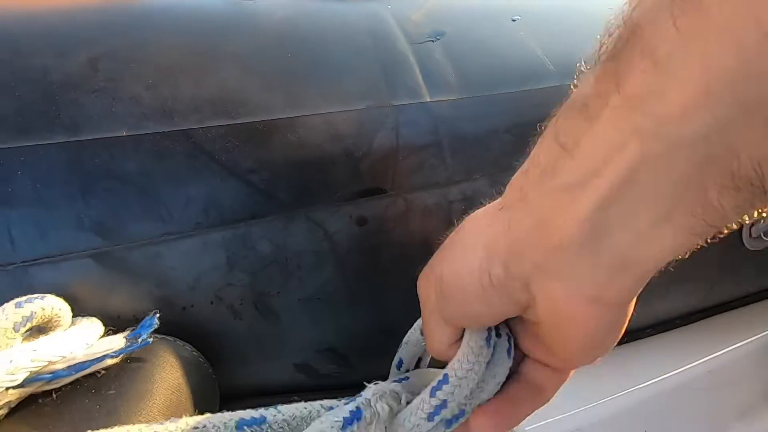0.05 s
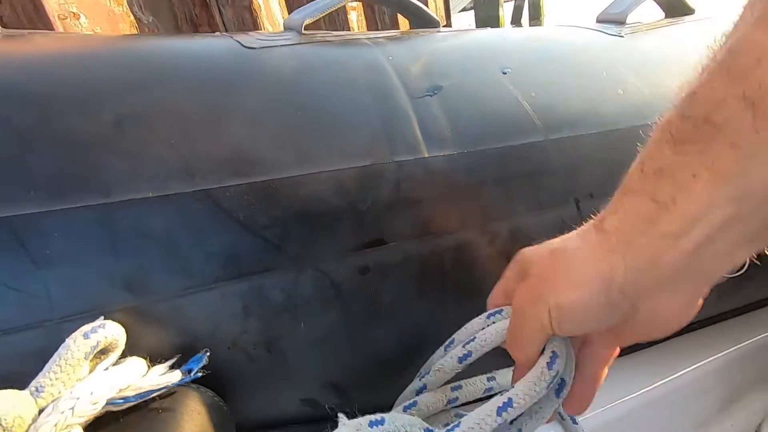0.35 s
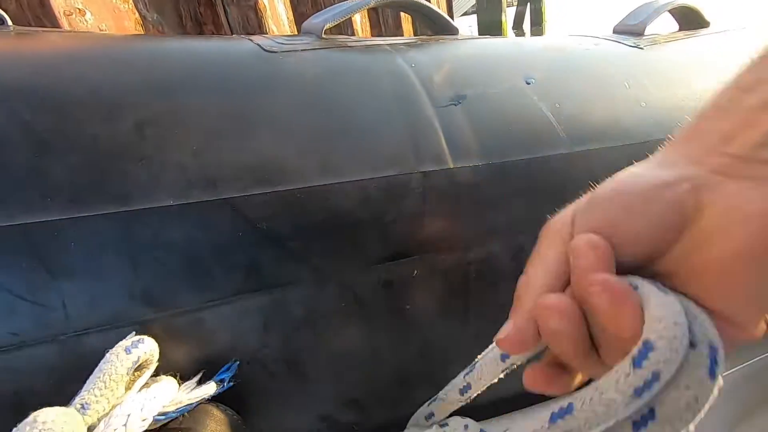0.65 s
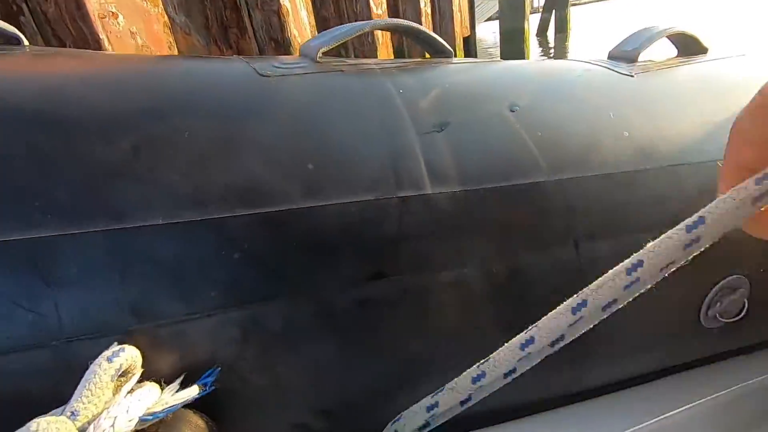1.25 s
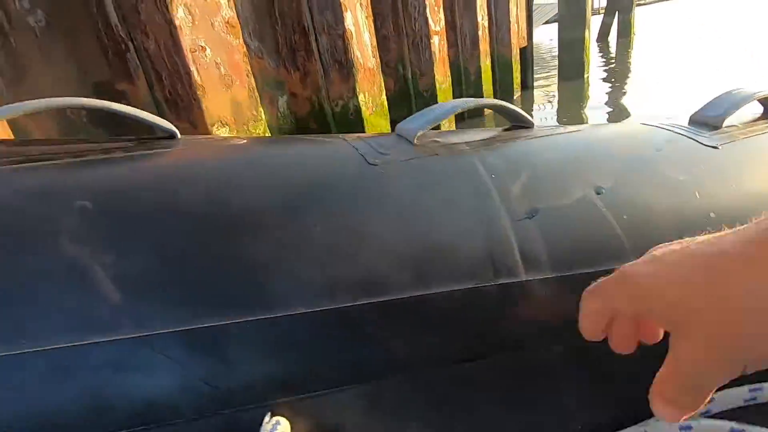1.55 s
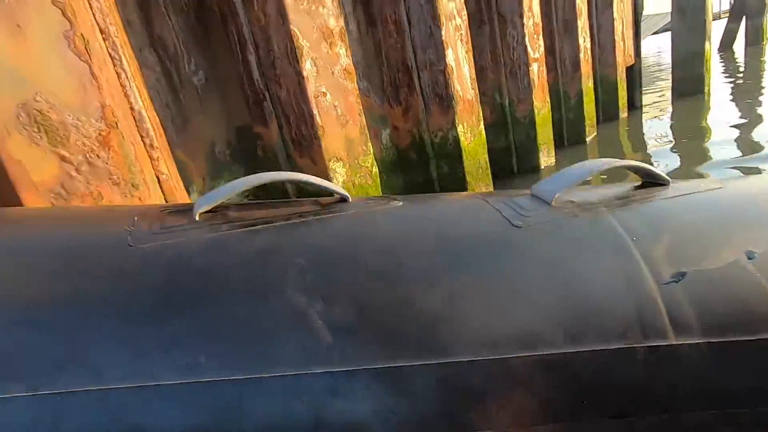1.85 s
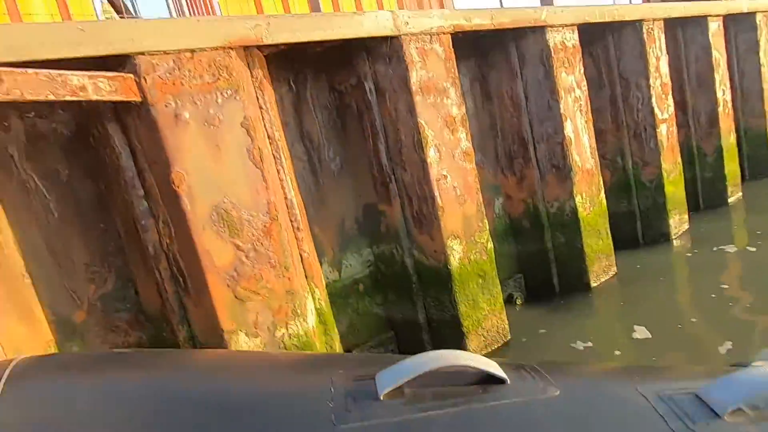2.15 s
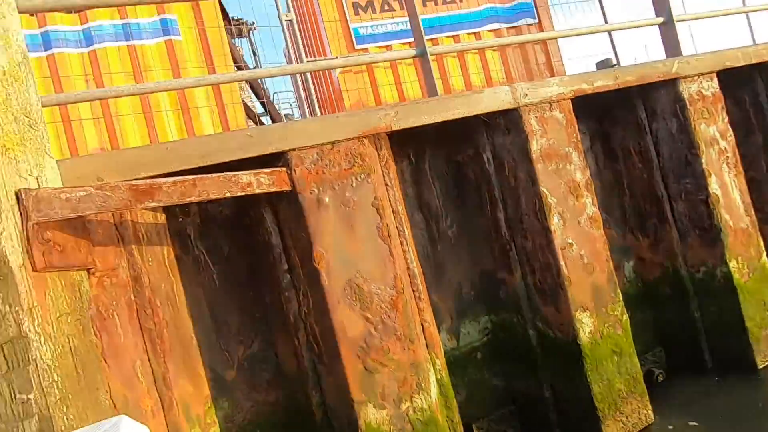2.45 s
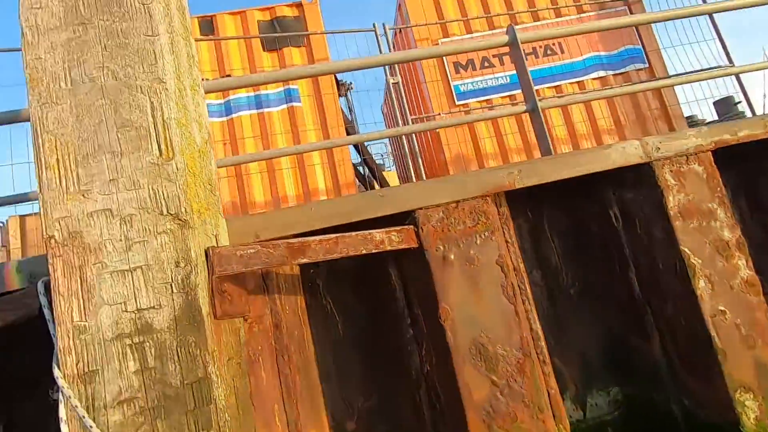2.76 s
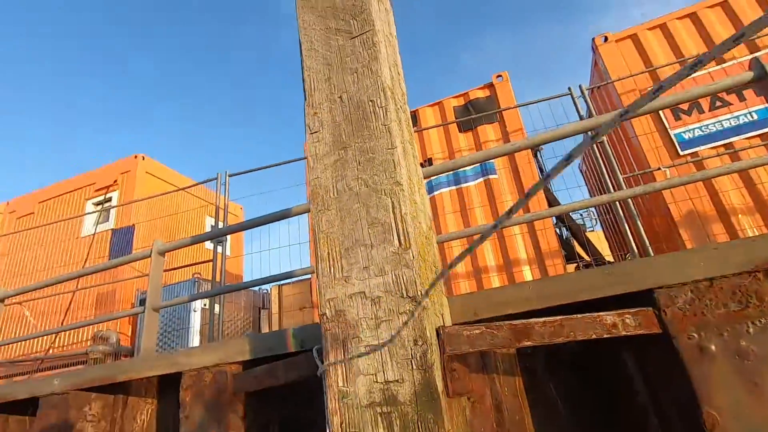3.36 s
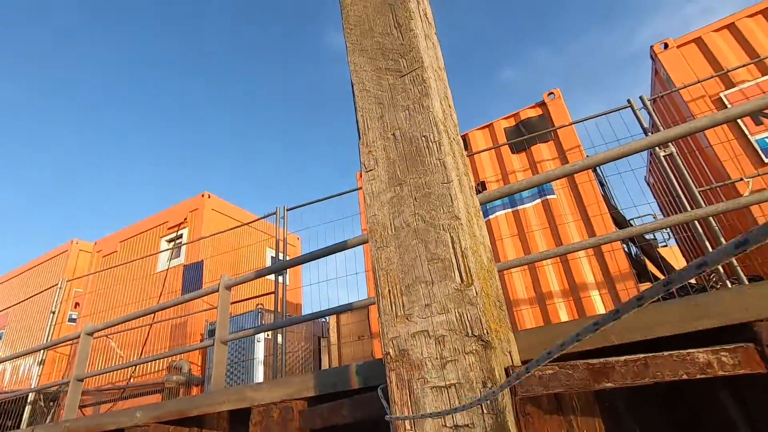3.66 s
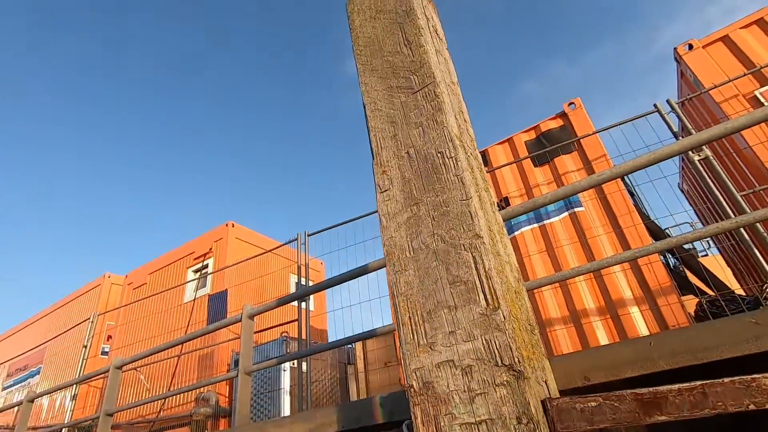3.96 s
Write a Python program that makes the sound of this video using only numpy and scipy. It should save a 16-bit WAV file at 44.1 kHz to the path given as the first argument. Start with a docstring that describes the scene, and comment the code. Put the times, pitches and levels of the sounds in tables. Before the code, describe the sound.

A rope hisses through a hand and thumps an inflatable boat over low wind rumble.

```python
"""A mooring rope is gathered in an inflatable boat and cast round a wooden pile at a steel quay.
Its braid hisses through the hand, rasps, zips and squeaks, and scuffs and thumps the ringing air tube.
It knocks twice right at the microphone with a puff of air, and at the end it slaps round the pile.
Underneath, wind rumbles and water laps, with a faint harbour hiss and a low hum that fades."""
import sys
import numpy as np
from scipy import signal
from scipy.fft import rfft, irfft
from scipy.io import wavfile
from scipy.ndimage import uniform_filter1d, minimum_filter1d

SR = 44100
rng = np.random.default_rng(int(sys.argv[2]) if len(sys.argv) > 2 else 0)


def generate_wav(signal):
    """Clip the signal to [-1, 1] and save it as 16-bit WAV at the path in sys.argv[1]."""
    frames = np.transpose(np.atleast_2d(signal))
    scaled = np.clip(frames, -1, 1) * 32767
    pcm = np.round(scaled).astype(np.int16)
    wavfile.write(sys.argv[1], SR, pcm)


N = 176400
T = np.arange(N) / SR

# Fader rides for wind, harbour hiss, hum, water and loose rope: time_s, level_db
WIND_RIDE = [(0,-32),(.45,-35.5),(.7,-34.5),(.95,-35.5),(1.1,-35.5),(1.2,-35.5),(1.255,-29),(1.3,-38),(1.42,-45.5),(1.6,-47),(1.94,-32.5),(2.3,-33.5),(2.56,-35),(2.72,-33),(2.86,-30.5),(2.96,-30.5),(3.2,-38),(3.44,-38),(3.54,-29),(3.6,-40.5),(4,-49)]
HISS_RIDE = [(0,-45),(.6,-63.5),(.93,-50.5),(1.25,-92),(1.42,-57),(1.72,-57.5),(1.8,-49),(1.95,-42),(2.3,-46.5),(2.8,-44.5),(3.15,-47.5),(3.3,-47),(3.7,-46.5),(4,-45.5)]
HUM_RIDE = [(0,-29.5),(.17,-38),(.33,-28),(.42,-34.5),(.55,-41),(.88,-45),(1.1,-40.5),(1.4,-40),(1.6,-53.5),(4,-57)]
WATER_RIDE = [(0,-52),(.6,-44.5),(.9,-45.5),(1.2,-47.5),(1.42,-52.5),(1.6,-50),(1.95,-45),(2.4,-44),(2.75,-39.5),(3.1,-41),(3.35,-41.5),(3.7,-42),(4,-38.5)]
RUSTLE_RIDE = [(0,-65),(1.1,-67),(1.4,-70),(1.7,-77),(1.95,-68),(3.1,-74),(3.3,-73),(3.75,-74.5),(4,-86)]
# Stereo width: time_s, side_db
WIDTH_RIDE = [(0,-13),(1.15,-6),(1.24,-3.5),(1.38,-1.5),(1.5,-9),(1.8,-21.5),(1.95,-54),(4,-57)]
# Tone curves of the air noises: frequency_hz, gain_db
WIND_EQ = [(20,-0.5),(40,0),(90,-3.5),(130,-9),(200,-14.5),(320,-22.5),(480,-56),(900,-53)]
HISS_EQ = [(150,20),(400,-2),(600,1),(900,-5.5),(1400,-4),(2200,-8),(3100,-6.5),(4700,-16.5),(5900,-38.5),(8500,-38.5),(10500,-38),(15000,-42.5)]
GUST_EQ = [(28,-1.5),(42,-1.5),(90,1),(130,-12),(220,-31.5),(400,-48.5)]
PUFF_EQ = [(55,-12.5),(90,10.5),(170,-10),(340,-9),(500,-24),(900,-31)]
# Tone curves of the rope's contacts: frequency_hz, gain_db
SLIDE_EQ = [(300,-0.5),(600,8.5),(1300,4),(2600,6),(4200,4),(5800,-5),(8200,-3.5),(10500,-12.5),(12500,-14),(15500,-19.5)]
DRAG_EQ = [(80,-6),(150,6),(300,5),(480,0.5),(650,-5.5),(1100,-15.5),(1800,-22),(4000,-30),(7000,-53)]
SMACK_EQ = [(200,-13.5),(400,6.5),(620,6),(900,-8),(1300,-10),(2500,-36),(5000,-50)]
KNOCK_EQ = [(300,5),(700,10),(1100,4.5),(1700,8),(2500,-2),(5500,-4.5),(8000,-17.5),(11000,-34),(15000,-45.5)]
SLAP_EQ = [(250,1),(700,2),(1500,0.5),(3000,-3.5),(4600,-9),(5800,-31),(12000,-32)]
# Resonances of the water at the quay, the taut rope and the pile: pitch_hz, width_hz, gain_db
WATER_BANDS = [(147.6,42,4),(208.2,43,-2),(316,95,-11.5),(578.5,39,-11.5),(867,510,-29.5),(2920,260,-32.5)]
ROPE_BANDS = [(557,110,10.5),(830,130,-2.5),(1095,49,1.5),(1680,67,-1.5),(1900,110,3),(2302,260,1),(2690,90,6.5),(3200,250,3),(4430,1100,-7.5)]
PILE_BANDS = [(398,120,-17),(637,80,5.5),(965,100,2),(1210,59,5.5),(1670,110,-5.5),(2040,73,5.5),(2560,80,-5),(2772,53,1.5),(3230,130,-13)]
# Ring of the air tube: pitch_hz, gain_db, t60_s
TUBE_RING = [(110.4,3,0.19),(210.1,0,0.19),(281.7,1,0.14),(365.5,-8,0.12),(496,-3.5,.06),(580,-4.5,0.036),(700,-7.5,0.011),(940,-8,0.016),(1090,-12,0.018),(1565,-9,0.042),(2240,-26,.03),(3176,-16,0.022)]
# Ring of the microphone casing: pitch_hz, gain_db, t60_s, left_offset_db
CASING_RING = [(180,-14.5,.06,-8),(328,-8,0.041,-11),(535,-18.5,.025,-5),(712,-2.5,0.016,-4),(822,-6,0.017,0),(1297,1.5,0.02,2)]
# Bounces off deck, tube and quay: delay_s, gain_db
REFLECTIONS = [(.0029,-31.5),(.0087,-19),(.021,-23)]
# Gusts on the microphone: peak_s, rise_s, fall_s, level_db
WIND_GUSTS = [(1.1,0.011,.012,-27),(2.09,0.024,0.017,-36),(2.4,0.034,.05,-36),(2.68,0.011,0.047,-24),(2.79,0.025,0.028,-28.5),(2.96,.02,0.075,-28.5),(3.185,0.01,0.034,-29.5),(3.535,0.012,0.0089,-37)]
# Rope running through the hand: peak_s, rise_s, fall_s, level_db, cutoff_hz
HAND_SLIDES = [(0.249,0.047,0.13,-50,9200),(.48,0.03,0.086,-61.5,3840),(.755,0.055,0.026,-48.5,13400),(.85,0.025,0.03,-50,12000),(1.0,0.028,0.043,-51,6550),(1.212,0.039,0.032,-44.5,14800),(1.36,0.012,0.016,-51.5,6000),(1.825,.008,0.017,-64,14000),(1.98,0.045,0.022,-57.5,7360),(2.088,0.0054,0.023,-45,10000),(2.28,0.038,0.067,-61.5,7000),(2.55,0.034,0.037,-61.5,5970),(2.69,0.014,0.013,-54,4960),(2.98,0.14,0.027,-68,6900),(3.13,0.043,0.041,-60.5,10300),(3.43,0.0033,0.016,-49,5000),(3.558,0.009,0.03,-48,3980),(3.947,.012,0.016,-55.5,8750)]
# Rope dragging over the tube: peak_s, rise_s, fall_s, level_db
TUBE_DRAGS = [(.3,0.039,0.042,-44.5),(.85,0.019,0.013,-42),(1.236,0.0095,0.028,-28.5),(1.98,0.0096,0.0077,-45.5),(2.682,.025,0.035,-32),(2.87,0.045,0.037,-41.5),(3.005,0.03,0.022,-34.5),(3.184,0.0039,0.014,-42),(3.53,0.018,0.006,-34.5),(3.599,0.011,.012,-35)]
# Rope slipping in quick bursts: peak_s, rise_s, fall_s, level_db, cutoff_hz
ROPE_RASPS = [(0.84,.001,0.0041,-38.5,4000),(.851,0.0017,0.0041,-36,4000),(0.862,.003,0.011,-43,3500),(1.229,0.0017,0.0099,-34.5,900),(1.245,.008,0.013,-41.5,9000),(1.757,0.002,0.008,-43,2000),(1.821,0.0053,.012,-43,2510),(2.088,0.0043,0.01,-46.5,9000),(2.671,0.0054,0.013,-38.5,1500),(3.004,0.012,0.011,-48,613),(3.554,0.01,0.0082,-37.5,4000),(3.946,0.0085,0.011,-48.5,6000)]
# Zips, chirps and ticks of fibres: peak_s, level_db, pitch_hz, width_hz, fall_s
FIBRE_ZIPS = [(0.065,-54,4020,1510,0.003),(0.085,-52.5,4100,1590,0.0034),(0.188,-35,4100,700,0.0032),(1.2386,-35,7200,1300,0.0054),(1.245,-31.5,6950,800,0.0055),(1.518,-72.5,6720,4000,0.0145),(2.413,-57,5030,2500,0.0024),(2.669,-40,1045,200,0.033),(3.384,-45.5,4970,4130,0.0015),(3.881,-65,8650,1210,0.0032)]
# Rope dropping on the tube: start_s, thump_db, cutoff_hz, pitch_ratio, smack_db
ROPE_DROPS = [(.298,-39,700,1.1,-42),(1.611,-49,900,1.19,-50),(1.759,-37.5,1520,1.08,-33.5),(1.817,-27.5,1000,1.154,-31),(1.910,-32.5,507,1.01,-35.5),(2.166,-22,686,1.095,-17.5),(2.194,-24,200,1.17,-46),(2.242,-30,250,0.9,-44),(2.329,-27.5,513,.97,-31),(2.44,-46.5,1200,1.31,-54),(2.663,-45,1500,0.63,-43.5),(2.972,-37.5,600,1.2,-51),(3.006,-38,900,1.07,-39),(3.172,-35.5,380,0.99,-47),(3.539,-29.5,600,.9,-32)]
# Two touches, then two knocks at the microphone: start_s, crack_db, push_db, ring_db, push_left_offset_db
MIC_KNOCKS = [(1.248,-47,-11,-34,0),(1.2592,-45,-26,-20,-1.5),(1.2693,-14.5,-2.5,2.5,-12),(1.3495,-19,-8,-38,-3)]
# Rope wrapping round the pile: start_s, level_db, decay_s, cutoff_hz
PILE_SLAPS = [(3.572,-34,0.0082,3000),(3.582,-21,0.0066,3490),(3.595,-36,0.0049,1000),(3.605,-36,0.0036,500),(3.619,-45,0.0076,1800)]


def from_db(db):
    """Decibels to gain."""
    return 10 ** (np.asarray(db) / 20)


def rms_one(x):
    """Scale to rms 1."""
    return x / np.sqrt(np.mean(x ** 2) + 1e-20)


def fader(ride):
    """Gain over time along a ride."""
    return from_db(np.interp(T, *np.transpose(ride)))


def drift(rate_hz):
    """Smooth random wander with a spread of 1."""
    hop, run_in = 40, 2000
    r = np.exp(-2 * np.pi * rate_hz * hop / SR)
    slow = signal.lfilter([1], [1, -2 * r, r * r], rng.standard_normal(N // hop + run_in + 2))[run_in:]
    return np.interp(np.arange(N) / hop, np.arange(len(slow)), rms_one(slow))


def eq(x, curve):
    """Apply a tone curve that rolls off past its ends; white noise keeps its power."""
    hz, db = np.transpose(curve)
    f = np.arange(N // 2 + 1) * SR / N + 0.00079
    skirts = np.minimum(f / hz[0], 1) ** 2 * np.minimum(hz[-1] / f, 1) ** 2
    response = skirts * from_db(np.interp(np.log(f), np.log(hz), db))
    return irfft(rfft(x) * rms_one(response), N)


def colour(x, curve):
    """Apply a tone curve and scale to rms 1."""
    return rms_one(eq(x, curve))


def grains(per_s, spread_db):
    """Two rows of random clicks of uneven size."""
    sizes = from_db(spread_db * np.minimum(rng.exponential(1, (2, N)), 4)) * rng.choice([-1, 1], (2, N))
    return rms_one(sizes * (rng.random((2, N)) < per_s / SR))


def swell(peak_s, rise_s, fall_s, db):
    """A lopsided bell envelope."""
    out = np.zeros(N)
    near = (T > peak_s - 9 * rise_s) & (T < peak_s + 9 * fall_s)
    age = T[near] - peak_s
    out[near] = from_db(db) * np.exp(-np.abs(age / np.where(age < 0, rise_s, fall_s)) ** 1.85 / 2)
    return out


def decay(start_s, decay_s):
    """Hard attack, exponential tail."""
    return (T >= start_s) * np.exp(-np.clip((T - start_s) / decay_s, 0, 60))


def resonate(x, hz, width_hz):
    """Band-pass with a peak gain of 1."""
    r = np.exp(-np.pi * width_hz / SR)
    poles = [1, -2 * r * np.cos(2 * np.pi * hz / SR), r * r]
    return signal.lfilter(np.array([1, 0, -1]) * (1 - r * r) / 2, poles, x + 1e-18)


def body(x, bands):
    """Parallel resonances in alternating polarity."""
    return sum((-1) ** k * from_db(db) * resonate(x, hz, width)
               for k, (hz, width, db) in enumerate(bands))


def ring(x, hz, t60):
    """Each click sets a decaying sine ringing."""
    r, w = np.exp(-np.log(1000) / (t60 * SR)), 2 * np.pi * hz / SR
    return signal.lfilter([0, np.sin(w)], [1, -2 * r * np.cos(w), r * r], x + 1e-18)


def soften(x, hz):
    """One-pole low-pass."""
    r = np.exp(-2 * np.pi * hz / SR)
    return signal.lfilter([1 - r], [1, -r], x + 1e-18)


def pass_filter(x, kind, hz, order):
    """Flat low-pass or high-pass."""
    return signal.sosfilt(signal.butter(order, hz, kind, fs=SR, output="sos"), x)


def stereo(pair, side_db=0, treble_lift_db=0.5, treble_floor_db=-13.5):
    """Mid and side to left and right along the width ride; the treble spreads wider."""
    mid, side = pair
    treble = pass_filter(side, "high", hz=10100, order=2)
    side = (side + from_db(treble_lift_db) * treble) * fader(WIDTH_RIDE)
    side += from_db(treble_floor_db) * treble
    return mid + side * from_db(side_db) * np.array([[1], [-1]])


def reflect(x):
    """Direct sound plus a few near reflections."""
    return x + sum(from_db(db) * np.pad(x, ((0, 0), (int(s * SR), 0)))[:, :N] for s, db in REFLECTIONS)


def harbour_hiss(flicker_db=2.5):
    """A faint, flickering bed of hiss."""
    hiss = stereo(colour(rng.standard_normal((2, N)), HISS_EQ))
    return hiss * fader(HISS_RIDE) * from_db(flicker_db * drift(24))


def hum(pitch_hz=128.5, waver_hz=5.5, flutter_db=3):
    """A low tone, unsteady in pitch and level."""
    phase = 2 * np.pi * np.cumsum(pitch_hz + waver_hz * drift(19.3)) / SR
    return np.sqrt(2) * np.sin(phase) * fader(HUM_RIDE) * from_db(flutter_db * drift(11))


def wind(trim_db=2, lumps_db=1):
    """A lumpy low rumble, close to mono."""
    rumble = stereo(colour(rng.standard_normal((2, N)), WIND_EQ), side_db=-14.5)
    return rumble * fader(WIND_RIDE) * from_db(trim_db - lumps_db * drift(14))


def gusts():
    """Deep lumps of wind buffet the microphone."""
    return colour(rng.standard_normal(N), GUST_EQ) * sum(swell(*row) for row in WIND_GUSTS)


def water(lapping_db=0.5):
    """Water laps along the quay wall in a soft, hollow wash."""
    noise = rng.standard_normal(N)
    hollows = sum(from_db(db) * resonate(resonate(noise, hz, width), hz, width)
                  for hz, width, db in WATER_BANDS)
    return rms_one(hollows) * fader(WATER_RIDE) * from_db(lapping_db * drift(5.2))


def slides(flutter_db=1.5):
    """Braid fibres flick past the skin, in strokes over a faint running rustle."""
    fibres = colour(grains(per_s=7000, spread_db=1.66), SLIDE_EQ) * from_db(flutter_db * drift(60))
    strokes = sum(rms_one(pass_filter(fibres, "low", cutoff_hz, order=1)) * swell(*stroke)
                  for *stroke, cutoff_hz in HAND_SLIDES)
    return stereo(fibres * fader(RUSTLE_RIDE) + strokes, side_db=2)


def zips(sag=0.084, rise_ratio=0.19):
    """Fibres catch and let go with a brief ring that sags in pitch."""
    noise, out = stereo(rng.standard_normal((2, N))), 0
    for peak_s, db, hz, width_hz, fall_s in FIBRE_ZIPS:
        pitch_hz = hz * (1 + sag * np.exp(-np.clip((T - peak_s) / fall_s, 0, 60)))
        tone = np.sqrt(2) * np.sin(2 * np.pi * np.cumsum(pitch_hz) / SR)
        roughness = rms_one(soften(soften(noise, width_hz / 2), width_hz / 2))
        out += tone * roughness * swell(peak_s, rise_ratio * fall_s, fall_s, db)
    return out


def squeak(start_s=2.079, length_s=0.057, start_hz=1880, rise_hz_per_s=14000, roughness=0.0918):
    """Rope sticks and slips on rubber, faster as it is pulled: one rough, rising squeak."""
    age = np.clip(T - start_s, 0, length_s)
    pitch_hz = (start_hz + rise_hz_per_s * age) * (1 + roughness * drift(319))
    phase = 2 * np.pi * np.cumsum(pitch_hz) / SR
    envelope = np.sqrt(np.abs(np.sin(np.pi * age / length_s))) * decay(start_s, decay_s=0.061)
    return from_db(-41) * envelope * (np.sin(phase) + from_db(-9) * np.sin(2 * phase))


def rasps():
    """Bursts of slips excite the taut rope's resonances."""
    rasp = body(grains(per_s=1200, spread_db=4), ROPE_BANDS)
    return stereo(sum(rms_one(soften(rasp, cutoff_hz)) * swell(*burst)
                      for *burst, cutoff_hz in ROPE_RASPS))


def drags(ring_db=-6):
    """The braid bumps over the rubber: a dull scuff that also rings the tube."""
    bumps = grains(per_s=1700, spread_db=4.5)[0]
    tube = sum((-1) ** k * ring(bumps * from_db(db), hz, t60)
               for k, (hz, db, t60) in enumerate(TUBE_RING))
    scuff = colour(bumps, DRAG_EQ) + from_db(ring_db) * rms_one(tube)
    return scuff * sum(swell(*row) for row in TUBE_DRAGS)


def thumps(settle_per_s=440, settle_s=0.016, settle_db=-12.5):
    """A soft blow, then the rest of the coil settles; both ring the air tube."""
    out = np.zeros(N)
    for start_s, db, cutoff_hz, pitch_ratio, _ in ROPE_DROPS:
        start = int(start_s * SR)
        age = T[:min(SR // 2, N - start)]
        contacts = (rng.random(len(age)) < settle_per_s / SR) * rng.standard_normal(len(age))
        contacts *= np.exp(-age / settle_s) * from_db(settle_db)
        contacts[0] += 1  # the first blow
        force = from_db(db) * soften(contacts, cutoff_hz)
        for k, (hz, mode_db, t60) in enumerate(TUBE_RING):
            gain = (-1) ** k * from_db(mode_db + rng.normal(0, 1.3))
            out[start:start + len(age)] += ring(force * gain, hz * pitch_ratio, t60)
    return out


def smacks(decay_s=0.0033):
    """The short, hollow smack as the rope meets the rubber skin."""
    envelope = sum(from_db(db) * decay(start_s, decay_s) for start_s, *_, db in ROPE_DROPS)
    return eq(rng.standard_normal(N) * envelope, SMACK_EQ)


def air_puff(peak_s=1.275, flutter_hz=66, flutter_db=-15.5):
    """The passing rope pushes air into the right microphone port, where it flutters out."""
    puff = colour(rng.standard_normal(N), PUFF_EQ) * swell(peak_s, rise_s=0.0037, fall_s=0.016, db=-22.5)
    flutter = np.sin(2 * np.pi * flutter_hz * (T - peak_s)) * decay(peak_s, decay_s=0.028)
    return (puff + from_db(flutter_db) * flutter) * np.array([[0], [1]])


def knocks(push_hz=110, push_t60_s=0.02, ring_rise_s=0.0025, right_lag_s=0.0003, crack_left_db=-7):
    """Each knock is a crack, a low push and a short ring of the casing, stronger on the right."""
    out, crack_envelope = np.zeros((2, N)), np.zeros(N)
    for start_s, crack_db, push_db, ring_db, push_left_db in MIC_KNOCKS:
        snap, tail = decay(start_s, 0.00096), from_db(-10.5) * decay(start_s, 0.0055)
        crack_envelope += from_db(crack_db) * (snap + tail)
        push = np.sin(2 * np.pi * push_hz * (T - start_s)) * decay(start_s, push_t60_s / np.log(1000))
        out += from_db([[push_db + push_left_db], [push_db]]) * push
        age = np.clip(T - start_s - np.array([[0], [right_lag_s]]), 0, 1)
        for hz, db, t60, left_db in CASING_RING:
            envelope = (1 - np.exp(-(age / ring_rise_s) ** 2)) * np.exp(-np.log(1000) * age / t60)
            gains = from_db(ring_db + db) * from_db([[left_db], [0]])
            out += gains * envelope * np.sin(2 * np.pi * hz * age)
    cracks = eq(stereo(rng.standard_normal((2, N))) * crack_envelope, KNOCK_EQ)
    return out + cracks * from_db([[crack_left_db], [0]])


def slaps(wood_db=8.5, crack_db=-7.5):
    """The rope wraps round the pile in a dense run of contacts that crack and ring briefly."""
    contacts = grains(per_s=5000, spread_db=1.3)[0]
    force = sum(rms_one(soften(contacts, cutoff_hz)) * from_db(db) * decay(start_s, decay_s)
                for start_s, db, decay_s, cutoff_hz in PILE_SLAPS)
    wood = pass_filter(body(force, PILE_BANDS), "low", hz=5500, order=4)
    return from_db(wood_db) * wood + from_db(crack_db) * eq(force, SLAP_EQ)


def scene():
    """The rope up front, over the harbour bed."""
    rope = reflect(slides() + drags() + rasps() + squeak() + slaps()) + thumps() + smacks() + zips()
    bed = wind() + harbour_hiss() + hum() + gusts() + water()
    return bed + rope + knocks() + air_puff()


def record(dry):
    """A fast limiter holds the peaks, then a steep low-pass trims the top."""
    ceiling, window_samples, stopband_hz = 0.97, 129, 16956
    gain = 1 / np.maximum(np.abs(dry).max(axis=0) / ceiling, 1)
    gain = uniform_filter1d(minimum_filter1d(gain, window_samples), window_samples)
    return signal.sosfilt(signal.cheby2(12, 70, stopband_hz, fs=SR, output="sos"), dry * gain)


dry = scene()
out = record(dry)
generate_wav(out)
```